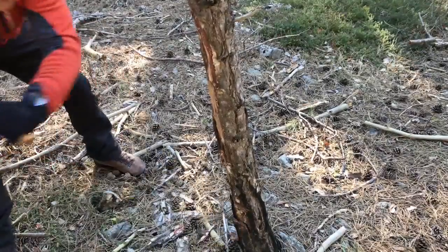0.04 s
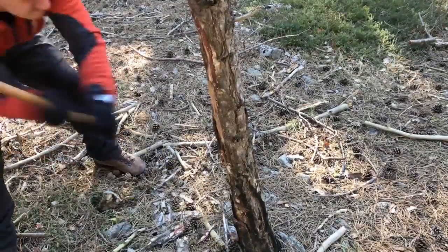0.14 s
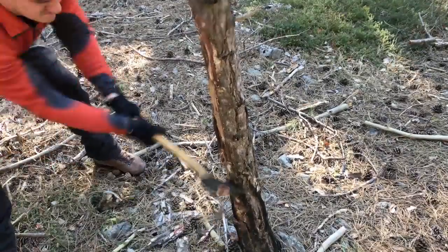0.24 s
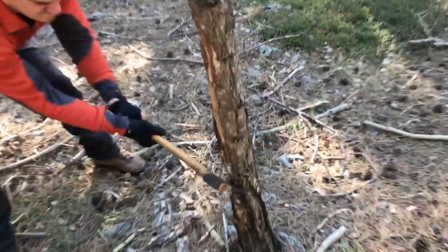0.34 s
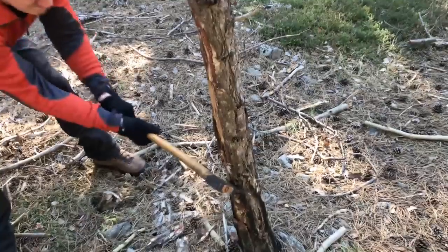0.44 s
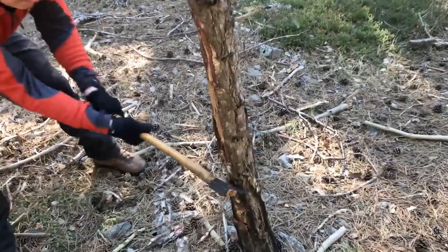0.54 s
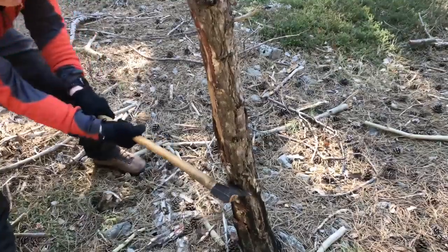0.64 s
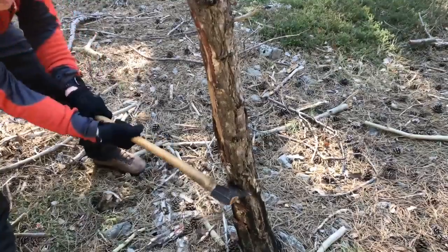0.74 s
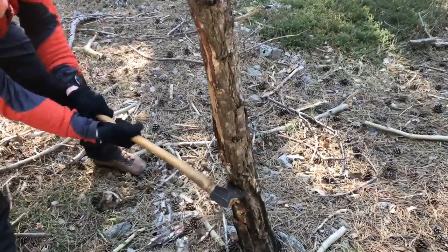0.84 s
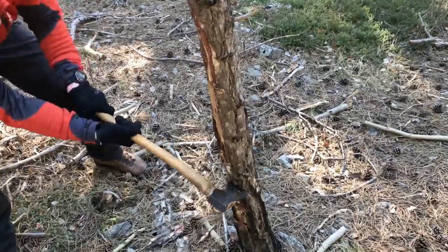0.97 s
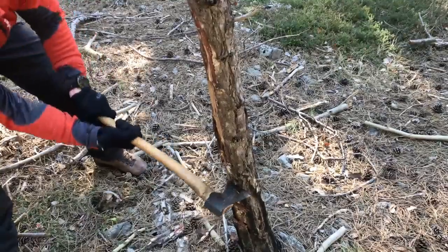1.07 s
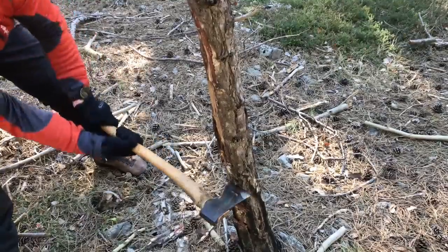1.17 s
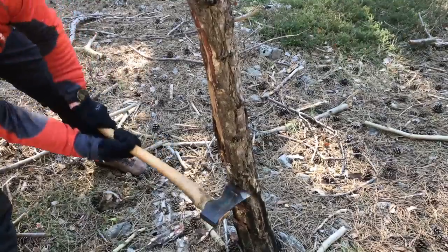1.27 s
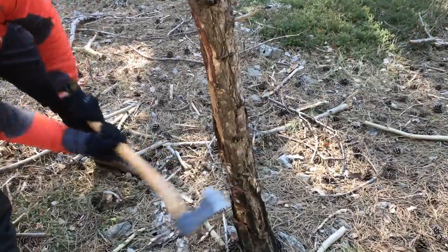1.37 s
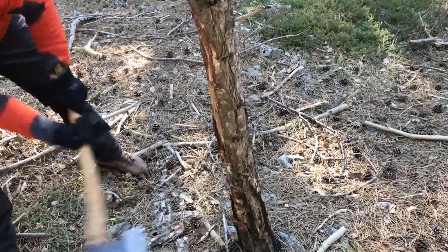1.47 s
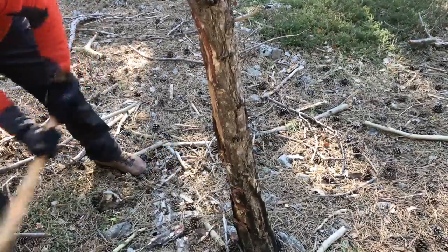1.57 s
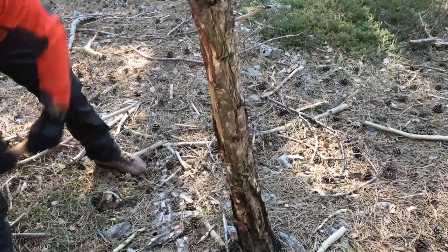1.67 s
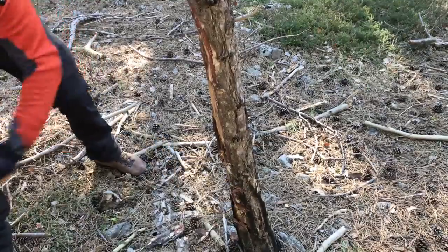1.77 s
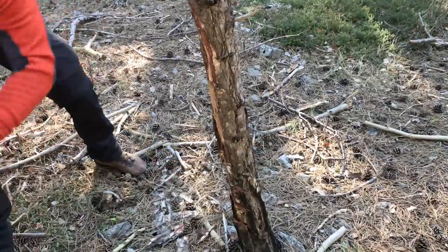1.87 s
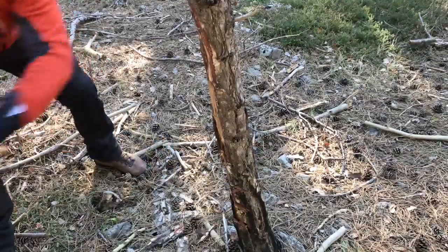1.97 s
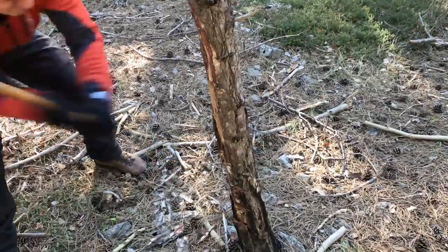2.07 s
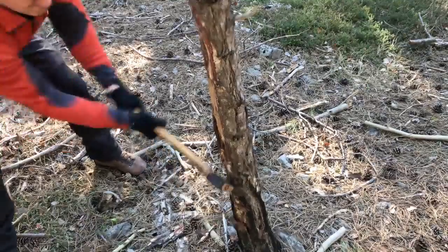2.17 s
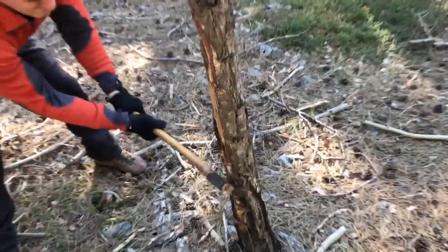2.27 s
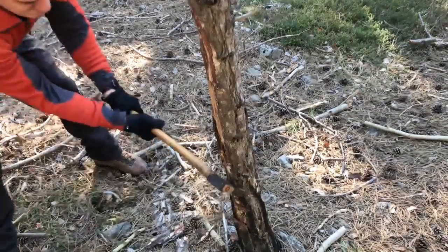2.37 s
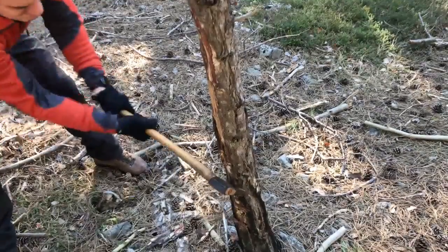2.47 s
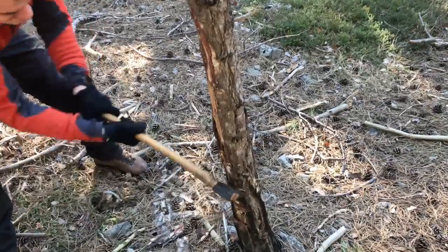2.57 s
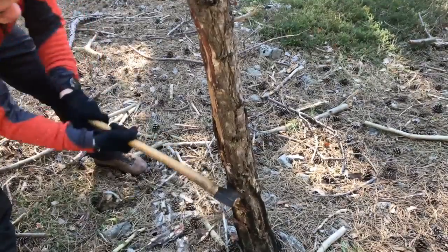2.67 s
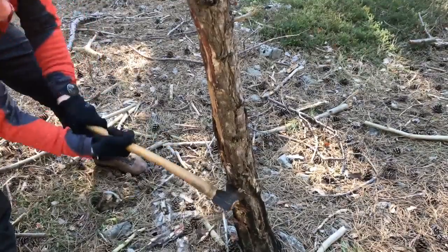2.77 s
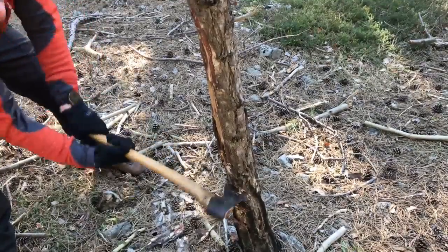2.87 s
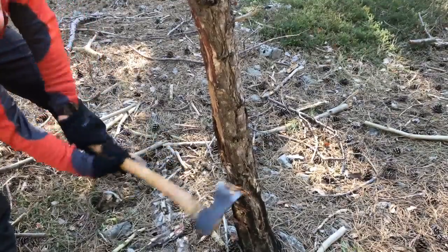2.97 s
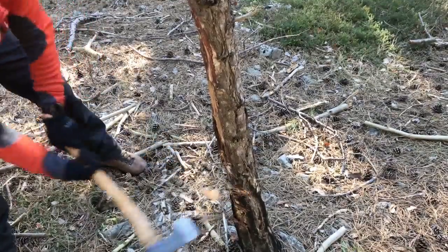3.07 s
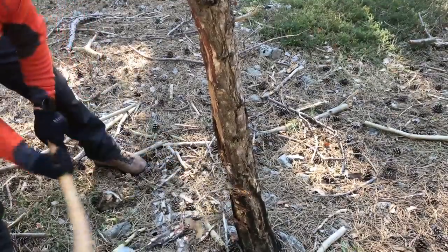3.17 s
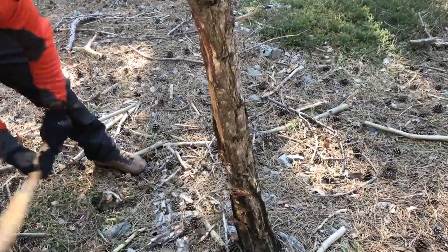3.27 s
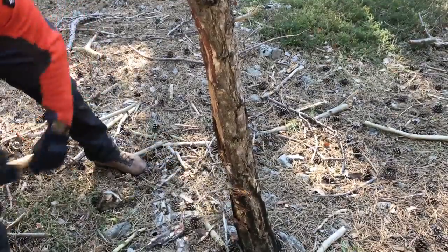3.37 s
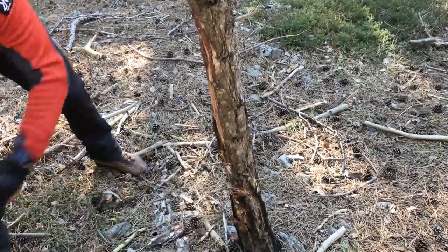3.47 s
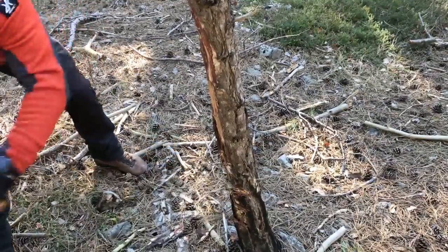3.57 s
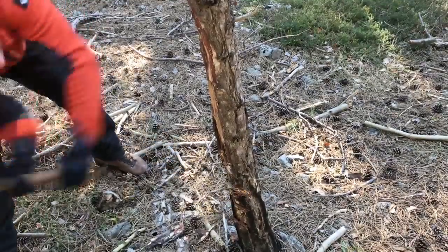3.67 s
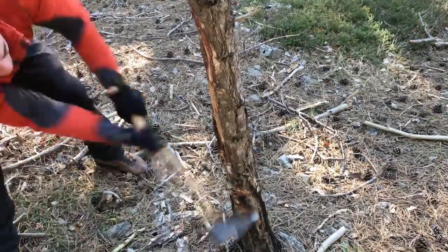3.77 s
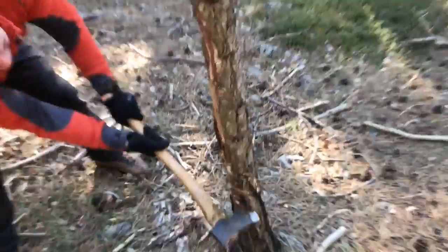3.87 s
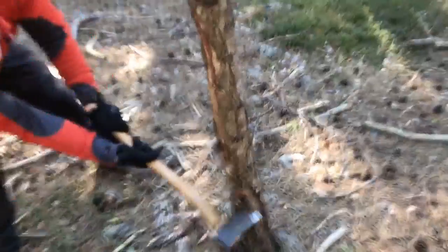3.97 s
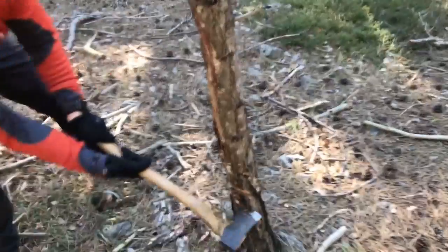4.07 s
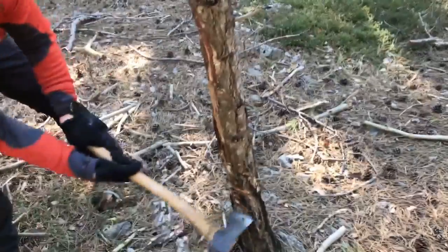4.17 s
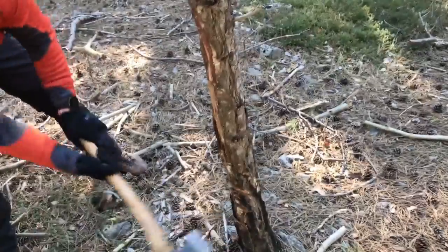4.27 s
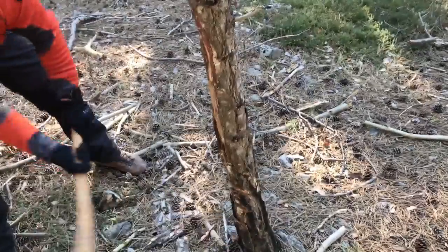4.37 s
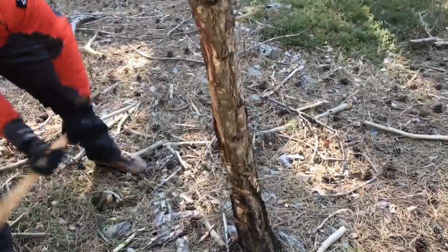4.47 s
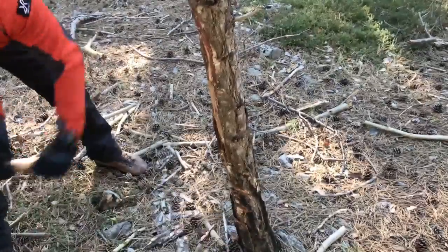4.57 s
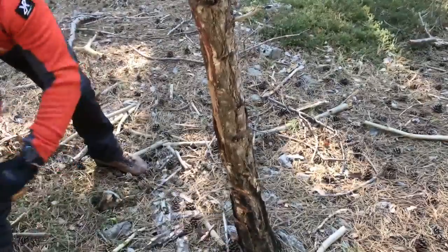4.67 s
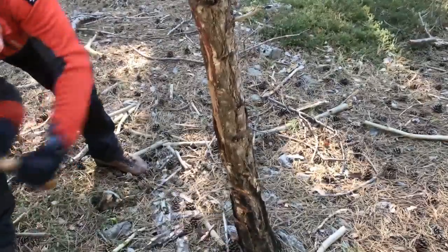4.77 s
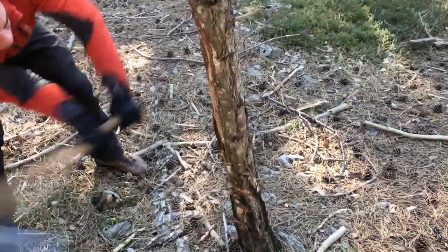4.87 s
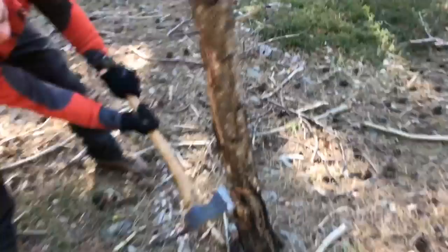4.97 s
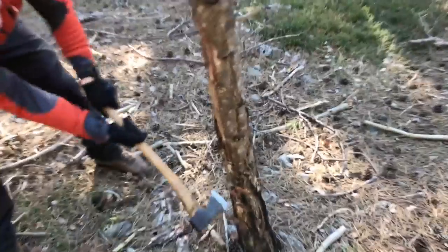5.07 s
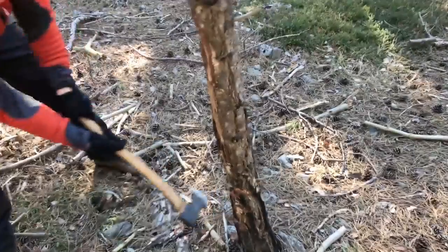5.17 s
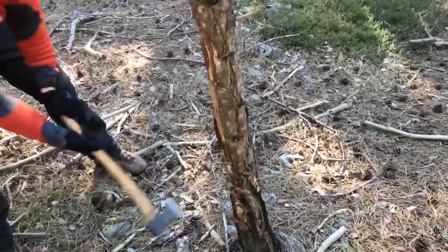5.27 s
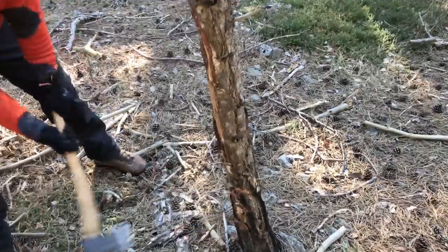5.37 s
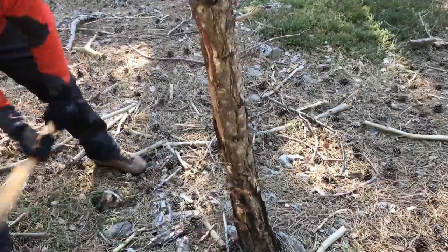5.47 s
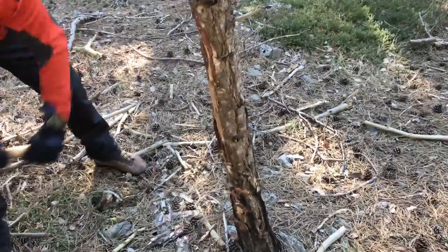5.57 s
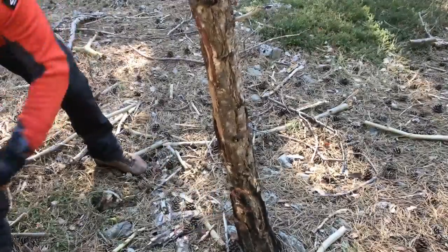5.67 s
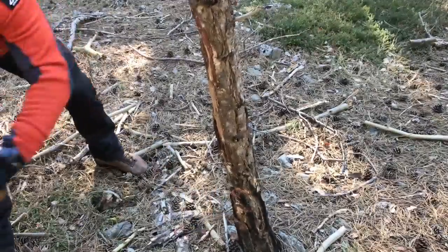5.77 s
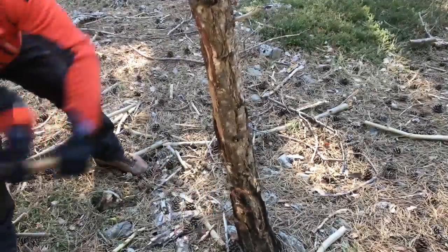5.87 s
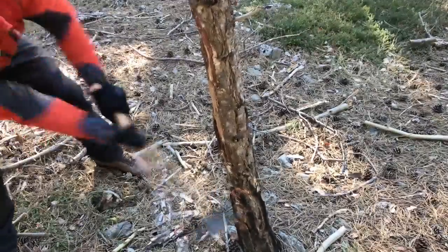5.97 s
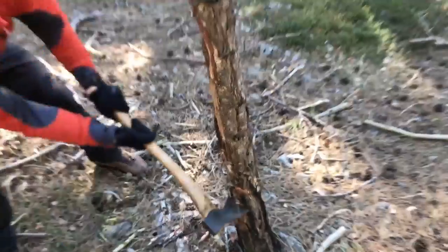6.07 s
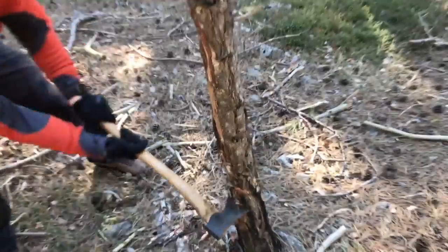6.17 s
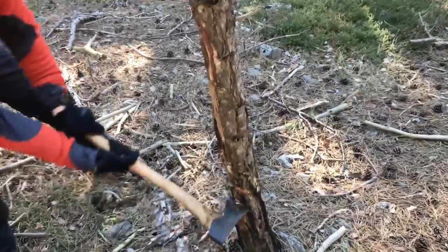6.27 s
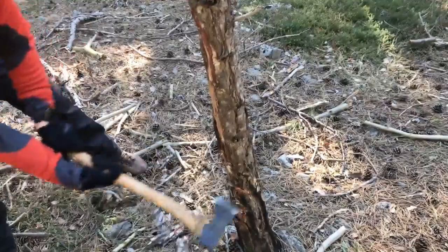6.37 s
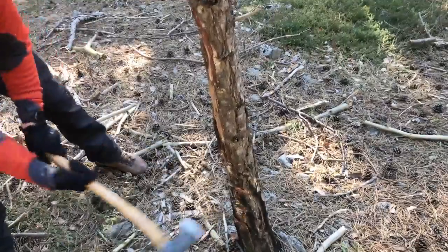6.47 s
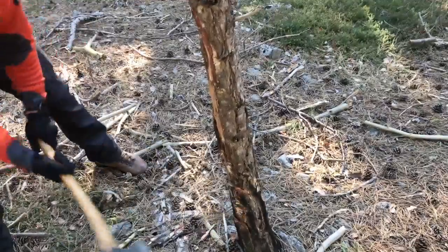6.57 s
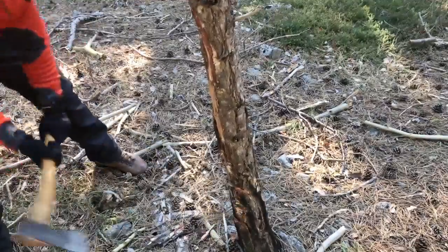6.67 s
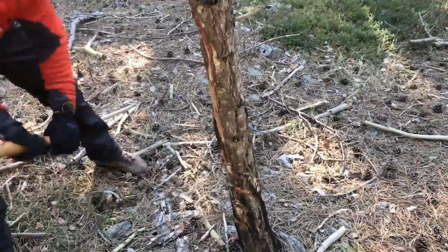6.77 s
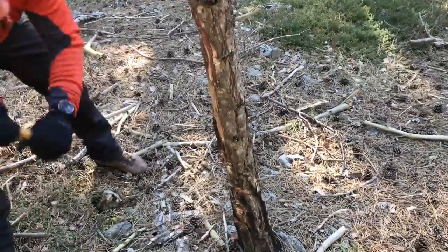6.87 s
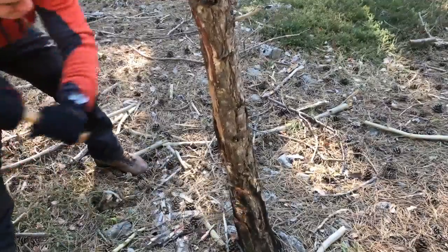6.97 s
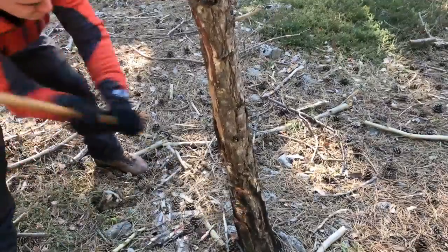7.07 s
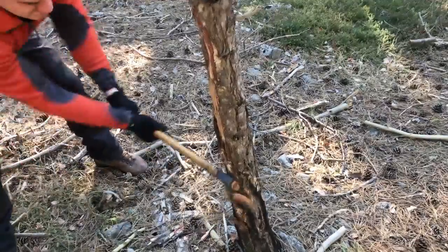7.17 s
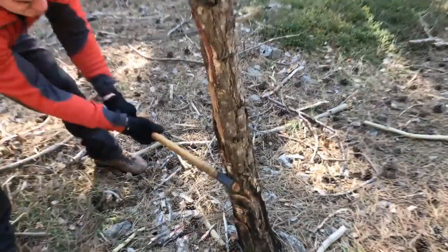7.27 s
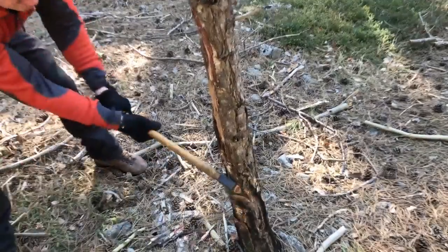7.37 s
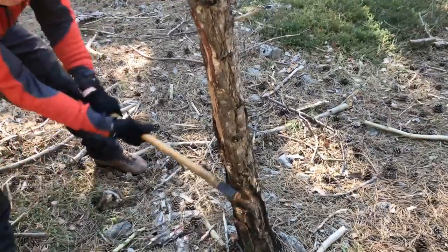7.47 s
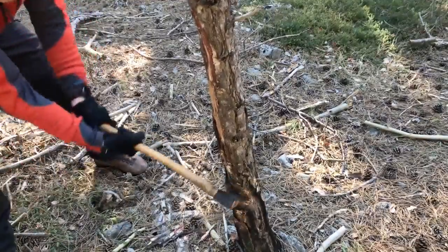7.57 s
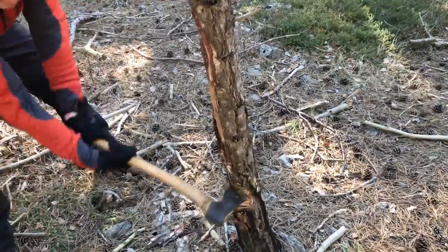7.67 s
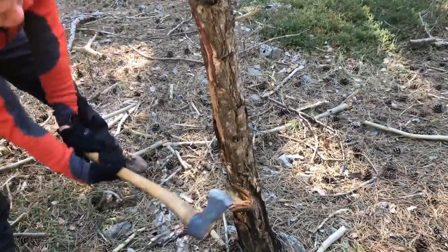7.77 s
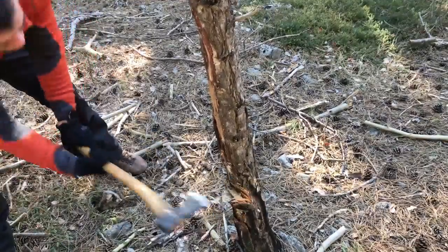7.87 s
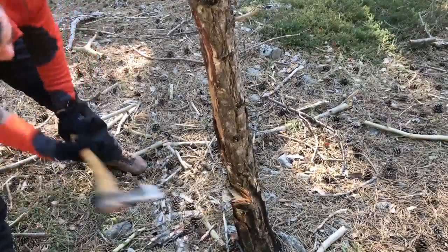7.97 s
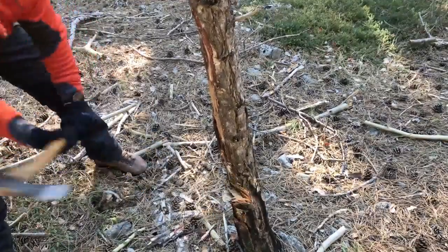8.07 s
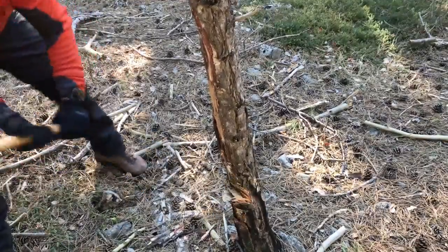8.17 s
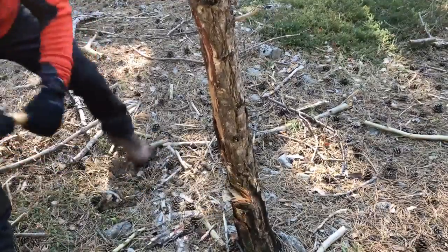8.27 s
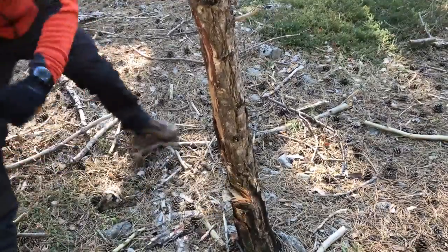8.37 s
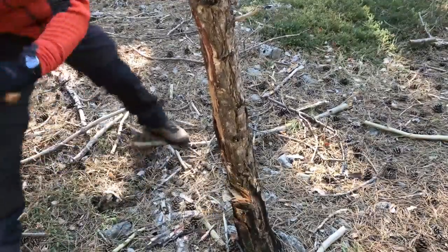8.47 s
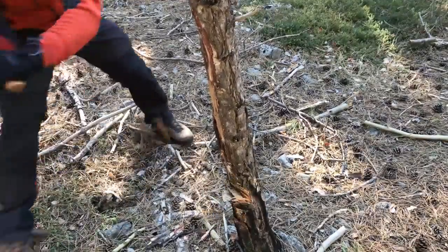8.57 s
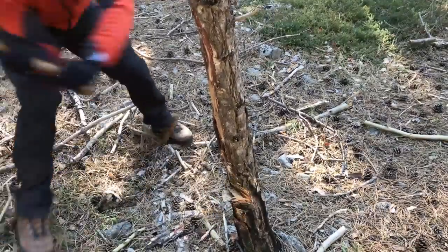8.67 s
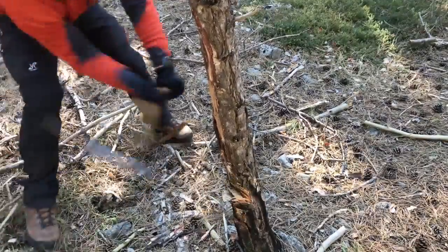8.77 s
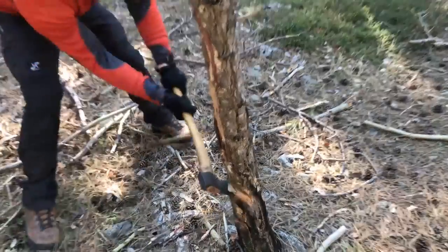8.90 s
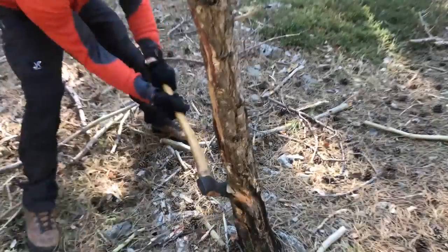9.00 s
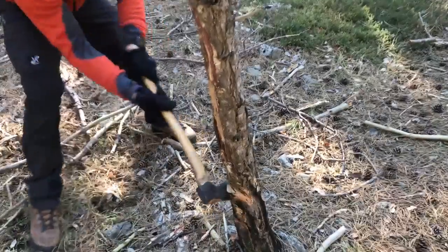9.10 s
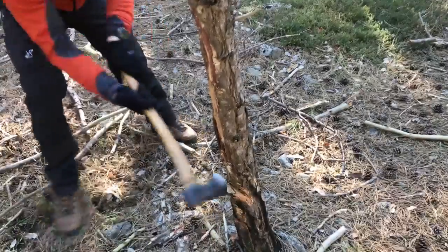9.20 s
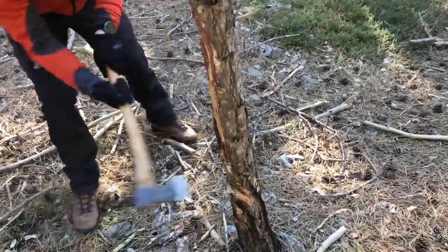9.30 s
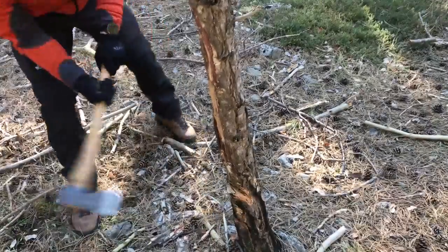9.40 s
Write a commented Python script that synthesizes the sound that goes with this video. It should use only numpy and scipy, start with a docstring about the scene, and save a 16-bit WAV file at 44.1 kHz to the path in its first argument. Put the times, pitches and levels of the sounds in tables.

```python
"""Quiet forest air and stirring needles come first; then seven axe blows bite into a thin, dry trunk, close by.
Each blow is dense random fibre breaks, then damped modes for a hollow trunk knock and a thud in the roots.
Random echoes from the trees answer, and chips and needles patter down as ticks and filtered crackle.
Between blows torn fibres, creaks and scrapes free the blade, which rings faintly after the first and sixth.
Boots shift on the needles throughout; before and after the last blow, legs and soles brush in clumpy hiss."""
import sys
import numpy as np
from scipy import signal
from scipy.io import wavfile
from scipy.ndimage import uniform_filter1d

SR = 44100
rng = np.random.default_rng(int(sys.argv[2]) if len(sys.argv) > 2 else 0)


def output_pcm(signal):
    """Save a mono or channel-first signal as 16-bit PCM at the path in sys.argv[1].

    Samples are clipped to [-1, 1] before scaling.
    """
    pcm = np.clip(np.atleast_2d(signal).T, -1, 1) * 32767
    wavfile.write(sys.argv[1], SR, np.round(pcm).astype(np.int16))


N = 416304  # length in samples

# The axe blows: (time [s], bite length [s], crack level [dB], crack pitch [factor], splinter fizz level [dB],
# fizz tilt [dB per octave], trunk knock level [dB], favoured mode frequency at the struck spot [Hz],
# root thud level [dB], far forest echo gain [dB], bark spray level [dB])
BLOWS = [(0.3823, 0.0063, -13, 0.85, -12, -4, -17.5, 740, -20, -2.5, -53),
         (2.3135, 0.0053, -13.5, 0.92, -13.5, -6.5, -15, 660, -20.5, -1, -57.5),
         (3.9339, 0.0034, -11.5, 0.72, -10, -0.5, -8.5, 1080, -15.5, 2.5, -59.5),
         (5.0868, 0.0052, -10.5, 0.78, -14, -2, -12.5, 902, -18.5, 3, -56),
         (6.1365, .0045, -12, 1.3, -14.5, -0.5, -9, 522, -17.5, -1.5, -61),
         (7.3098, 0.011, -13.5, 1.16, -14, 1, -18.5, 465, -21.5, -3.5, -60.5),
         (8.9581, 0.0075, -13, 1.03, -15, -4.5, -18.5, 550, -17.5, -3.5, -45)]
# Bright colour of splintering fibres: (frequency [Hz], relative level [dB])
SPLINTER_COLOUR = [(1000, -23), (3000, -10.5), (4200, -1), (5000, -4), (6500, -0.5), (8000, -3),
                   (10300, -4), (12000, -0.5), (16000, -2.5)]
# Colour of a small piece of dry wood, before any pitch change: (frequency [Hz], relative level [dB])
WOOD_COLOUR = [(100, -32), (400, -15), (1200, 2.5), (2000, 2), (3000, 3), (4200, 1), (7000, -12),
               (16000, -24)]


def gain_of(db):
    """Turns decibels into an amplitude factor."""
    return 10 ** (np.asarray(db) / 20)


def evened(x):
    """Scales to an rms of one."""
    return x / np.sqrt(np.mean(x ** 2) + 1e-20)


def read(points, hz):
    """Reads a table on a log-frequency axis."""
    f, value = np.transpose(points)
    return np.interp(np.log(hz + 1), np.log(f), value)


def add(mix, s, sound):
    """Mixes a sound in at a time in seconds, cut off at the end of the mix."""
    part = mix[max(round(s * SR), 0):][:len(sound)]
    part += sound[:len(part)]


def placed(events, source):
    """Lays out one sound per row: its time, then the settings of its source."""
    layer = np.zeros(N)
    for s, *settings in events:
        add(layer, s, source(*settings))
    return layer


def coloured(x, spectrum, size=2048):
    """Filters with a causal, minimum-phase response of unit energy that follows the spectrum."""
    hz = abs(np.fft.fftfreq(size, 1 / SR))
    log_gain = np.log(gain_of(read(spectrum, hz)))
    response = np.exp(np.conj(signal.hilbert(log_gain)))
    taps = np.fft.ifft(response).real[:size // 2]
    return signal.oaconvolve(x, taps / np.linalg.norm(taps))[:len(x)]


def crackle(count, per_s, spread_db):
    """A random train of clicks of either sign and uneven size, like tiny fractures, at an rms of one."""
    size = gain_of(spread_db * np.minimum(rng.exponential(1, count), 4))
    sign = rng.choice([-1, 1], count)
    happens = rng.random(count) < per_s / SR
    return evened(size * sign * happens)


def ring(modes, t, lag):
    """Damped bending modes; slow, low waves build up later than high ones."""
    out = np.zeros(len(t))
    for hz, db, t60 in modes:
        rise = lag / np.sqrt(hz)
        age = np.maximum(t - rise, 0)
        decay = gain_of(db - 60 * age / t60)
        build_up = 1 - np.exp(-(age / rise) ** 2)
        out += decay * build_up * np.sin(2 * np.pi * hz * age)
    return out


def tearing(t, bite, rise, release, per_s=9000, spread_db=3):
    """Fibres break densely while the blade sinks in, and die out once it stops."""
    force = (1 - np.exp(-t / rise)) * np.exp(-np.maximum(t - bite, 0) / release)
    breaks = force * crackle(len(t), per_s, spread_db)
    # every burst carries the energy of its force, however its fractures fall
    return breaks * np.linalg.norm(force) / (np.linalg.norm(breaks) + 1e-12)


def forest_air():
    """Steady coloured noise of the air among the trees."""
    # Colour of the air: (frequency [Hz], relative level [dB])
    air_colour = [(25, -11), (70, 5.5), (200, 1.5), (505, -5), (1200, -2), (2800, -11), (4100, -13.5),
                  (5200, -21), (8300, -17.5), (10300, -25.5), (12000, -23), (15500, -20)]
    air_db = -67.5
    return gain_of(air_db) * coloured(rng.standard_normal(N), air_colour)


def scatter(x, bands, onset, per_s):
    """Separate echoes from many trunks, each band dying at its own speed."""
    bands = np.array(bands)
    echoes = crackle(2 * SR, per_s, spread_db=-0.5)
    hz, t, z = signal.stft(echoes, SR, nperseg=256)
    band_db = read(bands[:, :2], hz)[:, None]
    t60 = read(bands[:, [0, 2]], hz)[:, None]
    stand_db = 4 * np.exp(-((t - .33) / 0.12) ** 2)  # a denser stand of trees further off
    even_energy = np.sqrt(2 * np.log(1000) / t60 / SR)  # long decays weigh no more than short ones
    shape = gain_of(band_db - 60 * t / t60 + stand_db) * even_energy
    tail = signal.istft(z * shape, SR, nperseg=256)[1]
    tail *= 1 - np.exp(-(np.arange(len(tail)) / SR / onset) ** 2)
    return signal.fftconvolve(x, tail)[:N]


def forest_echoes(close):
    """Trees scatter the blows back along three directions, and the nearest return every close sound."""
    # Scatter from the nearest trunks, before the gains below: (frequency [Hz], level [dB], t60 [s])
    near_trunks = [(50, -18, 0.47), (200, -15.5, 0.54), (600, -23, 0.36), (1490, -18, 0.32),
                   (3980, -19.5, 0.35), (14000, -28, 0.19)]
    # Scatter from the deep forest, before the gains below: (frequency [Hz], level [dB], t60 [s])
    deep_forest = [(58, -14.5, 1.5), (130, -27.5, 1.9), (405, -32.5, 0.86), (1200, -25.5, 1.7),
                   (3000, -26, 0.86), (7000, -32, 1.1), (15000, -36, .7)]
    forest = np.zeros(N)
    for direction in range(3):  # the splitting wood radiates differently each way
        outward, carried = np.zeros(N), np.zeros(N)
        for s, *blow, echo_db, spray_db in BLOWS:
            sound = chop(*blow)
            add(outward, s, sound)
            add(carried, s, gain_of(echo_db) * sound)
        forest += gain_of(-8.5) * scatter(outward, near_trunks, onset=0.0044, per_s=2100)
        forest += gain_of(-8.5) * scatter(carried, deep_forest, onset=0.01, per_s=450)
    forest += gain_of(-5) * scatter(close, near_trunks, onset=0.0046, per_s=1800)
    return forest


def rustle_level(t):
    """Litter stirs faintly, with a spray and a slower shower after each blow and swells under shifting boots."""
    # Boots press the needles as the weight shifts: (middle time [s], length [s], level [dB])
    weight_shifts = [(0.15, 0.9, -60.5), (1.04, 0.56, -56.5), (1.801, .5, -62), (3.338, 0.17, -62),
                     (3.544, 0.046, -55), (3.75, 0.33, -57), (4.717, 0.53, -60.5), (5.757, 0.27, -59),
                     (7.875, 0.28, -53.5)]
    stir_db = -64.5  # the litter is never quite still
    spray_s = 0.064  # bark from the cut lands thickest after this time
    fall_s, shower_db = .28, -55.5  # flakes and needles shaken down are thickest after this time
    sharpness = 3  # exponent on the swell of spray and shower
    power = np.full(len(t), gain_of(stir_db) ** 2)
    for s, *blow, spray_db in BLOWS:
        for peak_s, db in (spray_s, spray_db), (fall_s, shower_db):
            fallen = np.maximum(t - s, 0) / peak_s
            swell = (fallen * np.exp(1 - fallen)) ** sharpness
            power += (gain_of(db) * swell) ** 2
    for s, length, db in weight_shifts:
        swell = np.exp(-(2 * (t - s) / length) ** 2)
        power += (gain_of(db) * swell) ** 2
    return np.sqrt(power)


def litter():
    """Countless needles crunch in little clumps, with sparser ticks from twigs of many sizes."""
    # Colour of crunching needles: (frequency [Hz], relative level [dB])
    needle_colour = [(100, -6), (400, -2.5), (1000, -0.5), (2500, -5.5), (4000, -2.5), (7000, -5),
                     (10300, -6.5), (12500, -3), (16000, -8)]
    t = np.arange(N) / SR
    clumps = gain_of(1.5 * evened(uniform_filter1d(rng.standard_normal(N), 350)))
    needles = coloured(crackle(N, per_s=5000, spread_db=2.5) * clumps, needle_colour)
    age, twigs = t[:SR // 100], np.zeros(N)
    for hz in np.geomspace(2800, 14000, 12):
        tone = 0.66 * np.sin(2 * np.pi * hz * age)
        tick = np.exp(-age / 0.00054) * (tone + rng.standard_normal(len(age)))
        snapping = crackle(N, per_s=7, spread_db=5)
        twigs += signal.oaconvolve(snapping, tick)[:N]
    return rustle_level(t) * evened(evened(needles) + evened(twigs))


def brush(length, db, swell):
    """Cloth and soles slide in a dense, clumpy hiss that swells, holds and dies as the foot settles."""
    # Colour of brushing cloth and soles: (frequency [Hz], relative level [dB])
    cloth_colour = [(100, -2), (400, -1.5), (1000, -2.5), (2200, -4.5), (4000, -3), (7000, -1), (10300, -1),
                    (12500, -1), (16000, 0)]
    release_s, clump_db = 0.036, 1.5
    t = np.arange(SR // 2) / SR
    speed = np.minimum(t / (swell * length), 1) * np.exp(-np.maximum(t - length, 0) / release_s)
    clumps = gain_of(clump_db * evened(uniform_filter1d(rng.standard_normal(len(t)), size=300)))
    rubbing = clumps * crackle(len(t), per_s=12000, spread_db=5.0)
    return gain_of(db) * speed * coloured(rubbing, cloth_colour)


def strides():
    """Trouser legs and soles brush over the needles while stepping round the tree."""
    # Brushes: (start time [s], length [s], level [dB], share of the length spent swelling [0-1])
    brushes = [(8.308, 0.15, -47, 0.58), (8.541, 0.14, -38, 0.095), (8.712, 0.17, -34.5, 0.22),
               (9.151, 0.25, -38.5, 1)]
    return placed(brushes, brush)


def step(db, length):
    """Soft soil gives under a weight: low, dull noise with a quick onset and a slower decay."""
    # Colour of the soil: (frequency [Hz], relative level [dB])
    soil_colour = [(25, -22), (60, 2), (130, 1), (300, 1.5), (700, -14), (1400, -8), (3000, -40),
                   (8000, -60)]
    u = np.arange(SR // 2) / SR / length
    press = (1 - np.exp(-6 * u)) * np.exp(1 - u) / 2
    return gain_of(db) * coloured(rng.standard_normal(len(u)) * press, soil_colour)


def thumps():
    """Boots and a heavy chip thump dully on the soil."""
    # Thumps: (time [s], level before the press envelope [dB], decay time [s])
    soil_thumps = [(4.079, -35.5, 0.014), (7.821, -57.5, 0.053), (8.387, -59, 0.041), (8.554, -47, 0.026),
                   (8.645, -30.5, 0.011), (8.769, -58, 0.13), (9.389, -45, 0.02)]
    return placed(soil_thumps, step)


def snap(tick_db, body_db):
    """A small piece of dry wood breaks or lands: a tick and a short clack of slightly random pitch."""
    t = np.arange(SR // 16) / SR
    tick_breaks = tearing(t, 0.00091, rise=.0001, release=0.0026, per_s=3700, spread_db=5.5)
    tick = coloured(tick_breaks, SPLINTER_COLOUR)
    pitch = np.exp(0.081 * rng.standard_normal())  # the size of the piece
    body = coloured(tearing(t, 0.0012, rise=0.00017, release=0.0022), np.array(WOOD_COLOUR) * [pitch, 1])
    return gain_of(tick_db) * tick + gain_of(body_db) * body


def loud_snaps():
    """The loudest chips land and twigs snap at set times."""
    # Snaps: (time [s], sharp tick level [dB], woody body level [dB])
    chips_and_twigs = [(0.7032, -38.5, -47), (1.051, -37, -47), (1.082, -32.5, -54), (1.202, -34.5, -46.5),
                       (1.352, -22, -33.5), (2.397, -24.5, -37), (2.456, -35, -55), (2.811, -45.5, -45),
                       (2.914, -40, -51.5), (3.0605, -33, -40), (3.520, -43, -62), (3.533, -36, -52),
                       (3.72, -40, -68), (3.795, -31, -34), (3.905, -42.5, -52), (4.079, -35.5, -40.5),
                       (4.243, -45, -38), (4.303, -35.5, -49), (4.38, -39, -37.5), (4.536, -30, -37),
                       (4.647, -39, -50), (4.781, -42.5, -60), (5.175, -29.5, -35.5), (5.301, -28.5, -38.5),
                       (5.384, -36, -46.5), (5.563, -38, -65), (6.470, -38.5, -49.5), (6.667, -45, -52.5),
                       (7.576, -36, -34), (7.684, -29.5, -24.5), (7.736, -23, -26), (8.296, -40.5, -48.5),
                       (8.6215, -27, -52), (8.781, -24, -53), (8.794, -22, -46)]
    return placed(chips_and_twigs, snap)


def chips(count=3):
    """The small chips of one blow patter down after random flights, at random sizes."""
    tick_db, body_db, spread_db = -44, -54.5, 4
    flights = rng.uniform(0.17, 0.28, count)  # seconds
    sizes_db = spread_db * rng.standard_normal(count)
    out = np.zeros(SR)
    for flight, size_db in zip(flights, sizes_db):
        add(out, flight, snap(tick_db + size_db, body_db + size_db))
    return out


def wrench(length, crackle_db, body_db):
    """Fibres break one after another under the levered blade, then let go at once."""
    t = np.arange(SR // 8) / SR
    pull = np.exp(-np.maximum(t - length, 0) / 0.0041)  # the fibres let go this fast, in seconds
    breaks = pull * crackle(len(t), per_s=2200, spread_db=3.5)
    sharp = gain_of(crackle_db) * coloured(breaks, SPLINTER_COLOUR)
    woody = gain_of(body_db) * coloured(breaks, WOOD_COLOUR)
    return sharp + woody


def slip(db, hz):
    """One jerk of steel against wood rings the lips of the cut for a few cycles."""
    t = np.arange(SR // 32) / SR
    creak = (1 - np.exp(-t / 0.00046)) * np.exp(-t / 0.0015) * np.sin(2 * np.pi * hz * t)
    rasp = coloured(tearing(t, 0.0005, rise=.0003, release=.002), WOOD_COLOUR)
    return gain_of(db) * (2.5 * creak + 0.88 * rasp)


def scrape(length, db):
    """Steel slips through the cut in quick, uneven jerks."""
    # Colour of steel rubbing on wood: (frequency [Hz], relative level [dB])
    rub_colour = [(300, -8), (900, -11), (1500, -6.5), (2200, -2.5), (3000, -8), (4200, -12), (5300, -8),
                  (7500, -14.5), (16000, -22)]
    count = int(length * SR)
    jerks = crackle(count, per_s=1800, spread_db=2.0) * np.hanning(count)
    return gain_of(db) * evened(coloured(jerks, rub_colour))


def blade(db):
    """The freed steel is plucked by the lip of the cut and rings, shimmering as it rubs past."""
    # Modes of the steel head: (frequency [Hz], relative level [dB], t60 [s])
    steel_modes = [(2280, -3, 0.05), (5330, 13, 0.028), (6562, -9, 0.066), (11700, -1, 0.06),
                   (12800, -11, .07), (14170, -4, 0.2)]
    t = np.arange(SR // 4) / SR
    shimmer = 1 + .3 * evened(uniform_filter1d(rng.standard_normal(len(t)), 90))
    swell = 1 - np.exp(-t / 0.0082)
    return gain_of(db + 8.5) * swell * shimmer * ring(steel_modes, t, lag=0.01)


def freeing_the_blade():
    """The wedged blade is levered out: fibres tear, the steel creaks, scrapes and rings faintly."""
    # Bark and fibres tear: (time [s], length [s], sharp crackle level [dB], woody body level [dB])
    wrenches = [(1.284, 0.014, -34, -53.5), (1.311, .036, -35.5, -45.5), (2.998, 0.013, -34, -40),
                (3.076, 0.046, -43, -51.5), (6.468, 0.023, -48, -47.5)]
    # Short creaks in the cut: (time [s], level before the mix of creak and rasp [dB], frequency [Hz])
    creaks = [(2.984, -28.5, 1374), (3.114, -40.5, 2000), (3.976, -32, 1790), (6.331, -34.5, 1760),
              (6.348, -40, 1720), (6.362, -39, 1490)]
    # Blade and bark rub along the cut: (time [s], length [s], level [dB])
    scrapes = [(1.453, 0.048, -53.5), (2.934, 0.15, -55), (3.072, 0.076, -49.5), (6.395, 0.052, -54),
               (7.8, 0.054, -46.5), (7.936, 0.033, -52)]
    # Blade rings: (time [s], level before a fixed lift of 8.5 dB [dB])
    blade_rings = [(1.468, -45.5), (7.822, -58)]
    tearing_free = placed(wrenches, wrench) + placed(creaks, slip)
    return tearing_free + placed(scrapes, scrape) + placed(blade_rings, blade)


def chop(bite, crack_db, crack_pitch, fizz_db, tilt_db, knock_db, spot_hz, thud_db):
    """The edge splits bark, the wedge cracks the wood, then trunk and roots take the blow."""
    # Colour of the cracking wood, before the pitch factor: (frequency [Hz], relative level [dB])
    crack_colour = [(150, -36), (450, -6.5), (1000, -2.5), (1700, -1), (2400, -5), (3300, -6), (5000, -18),
                    (8000, -28), (16000, -30)]
    # Trunk modes with the axe in it, before the struck spot's boost: (frequency [Hz], level [dB], t60 [s])
    trunk_modes = [(132, -2, 0.052), (163.7, -1.5, 0.066), (231.6, 3.5, 0.059), (286, -1.5, 0.068),
                   (461, -1.5, 0.037), (686, 1.5, 0.033), (894, 0, 0.028), (1075, -4, 0.039),
                   (1256, 0, 0.021)]
    # Modes of the roots and soil: (frequency [Hz], relative level [dB], t60 [s])
    root_modes = [(57.4, -7.5, 0.3), (68, -3.5, 0.18), (105, -9, 0.081)]
    t = np.arange(SR // 4) / SR

    splinters = tearing(t, bite * .5, rise=0.00018, release=0.004, per_s=3700, spread_db=3.0)
    crumbs = gain_of(-19.0) * tearing(t, bite, rise=0.0037, release=0.016, per_s=820, spread_db=3)
    fizz_colour = [(hz, db + tilt_db * np.log2(hz)) for hz, db in SPLINTER_COLOUR]
    fizz = coloured(splinters + crumbs, fizz_colour)

    fractures = tearing(t, bite, rise=.0005, release=0.0042, per_s=9000, spread_db=3.0)
    crack = coloured(fractures, np.array(crack_colour) * [crack_pitch, 1])

    struck = []
    for hz, db, t60 in trunk_modes:  # modes near the favoured frequency gain up to 6 dB
        boost_db = 6 * np.exp(-(np.log(hz / spot_hz) / 0.25) ** 2)
        struck.append((hz, db + boost_db, t60))
    loaded = np.maximum(t - bite / 2, 0)  # the trunk takes the load as the blade slows
    knock = ring(struck, loaded, lag=.028)
    thud = ring(root_modes, np.maximum(t - bite, 0), lag=0.027)

    wood = gain_of(fizz_db) * fizz + gain_of(crack_db) * crack
    return wood + gain_of(knock_db) * knock + gain_of(thud_db) * thud


def blows():
    """Each blow lands, its split runs on a moment later, and its chips fly."""
    split_delay_s = .025
    split_tick_db, split_body_db = -31, -21  # relative to the crack
    layer = np.zeros(N)
    for s, bite, crack_db, *blow, echo_db, spray_db in BLOWS:
        add(layer, s, chop(bite, crack_db, *blow))
        add(layer, s + split_delay_s, snap(crack_db + split_tick_db, crack_db + split_body_db))
        add(layer, s, chips())
    return layer


def scene():
    """All near sounds, their echoes among the trees, and the forest air."""
    close = thumps() + loud_snaps() + freeing_the_blade() + blows()
    # litter and strides are too soft to be given echoes
    return (forest_air() + forest_echoes(close) + litter() + strides() + close)[None]


def record(dry):
    """The microphone sheds deep bass, the loudest peaks round off at full scale; then the band limit."""
    low_cut_hz, edge_hz = 42, 15950
    low_cut = signal.butter(3, low_cut_hz, "highpass", fs=SR, output="sos")
    dry = signal.sosfilt(low_cut, dry)
    held = dry / (1 + dry ** 8) ** (1 / 8)
    band_limit = signal.firwin(255, edge_hz, window=("kaiser", 8), fs=SR)
    return signal.oaconvolve(held, band_limit[None], "same")


dry = scene()
out = record(dry)
output_pcm(out)
```